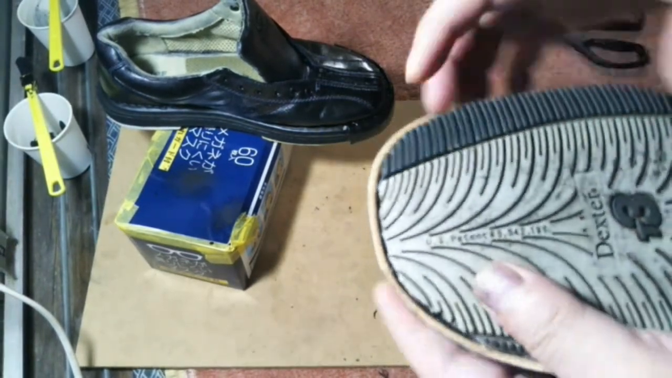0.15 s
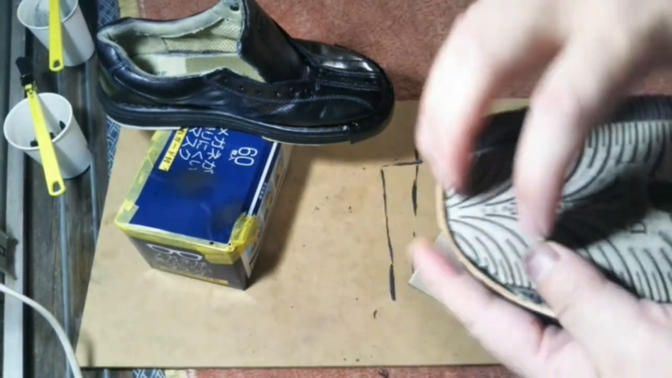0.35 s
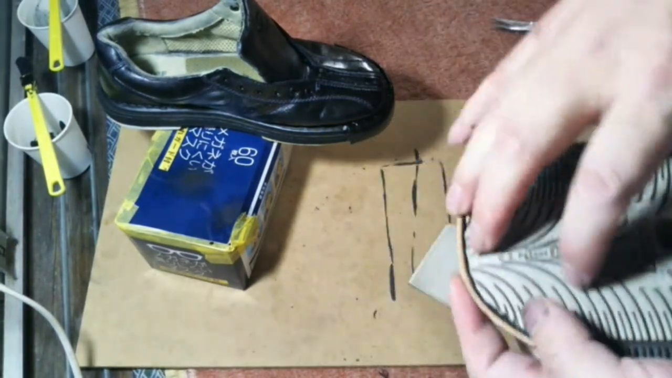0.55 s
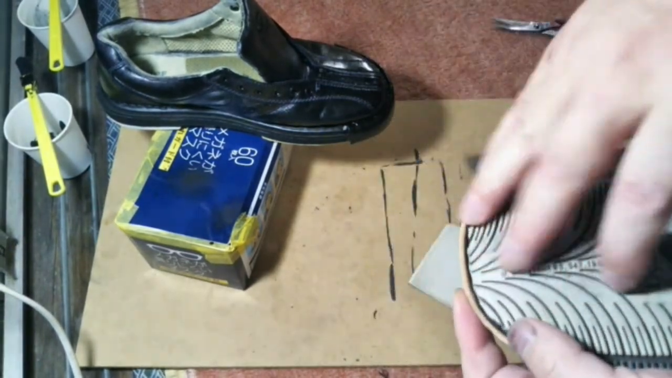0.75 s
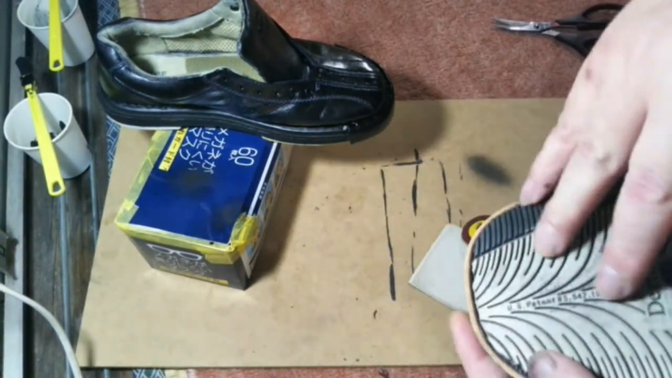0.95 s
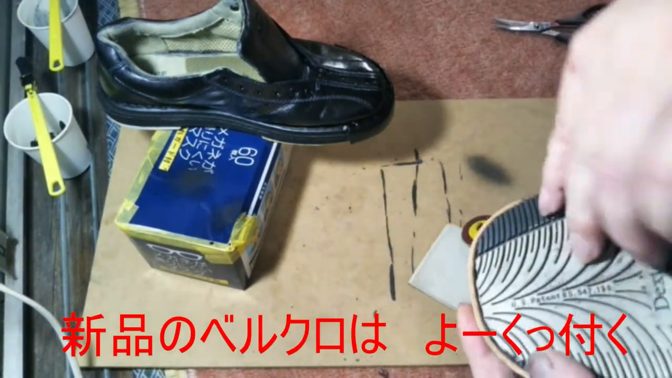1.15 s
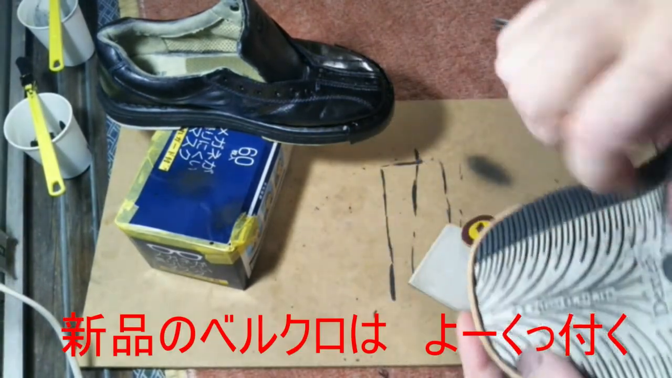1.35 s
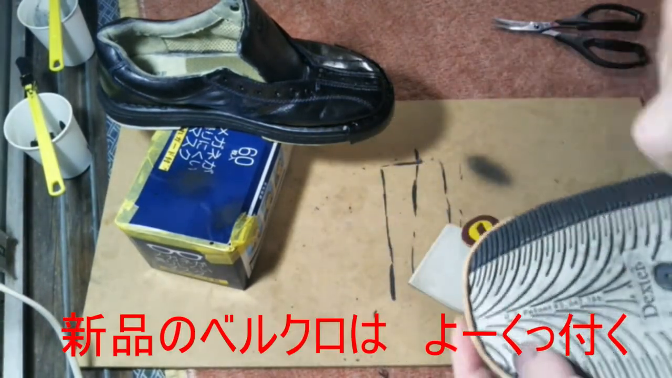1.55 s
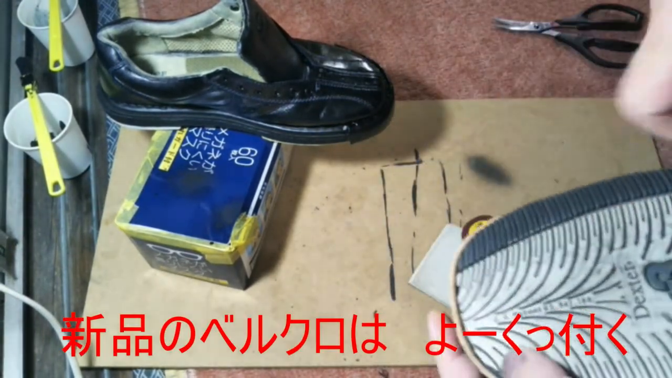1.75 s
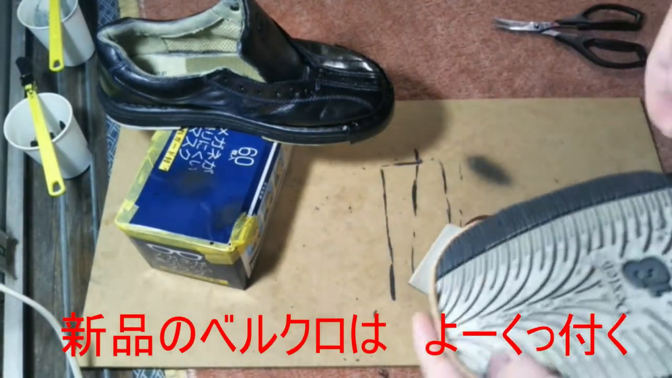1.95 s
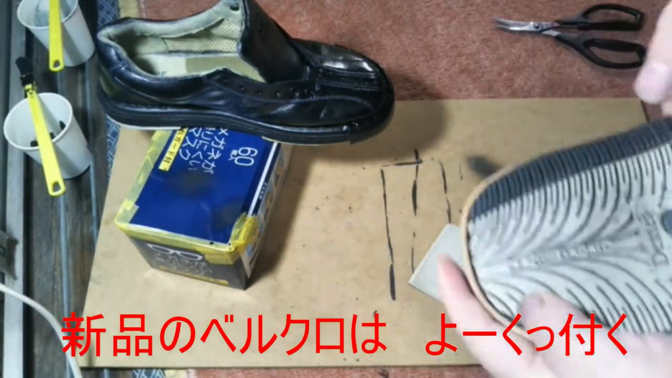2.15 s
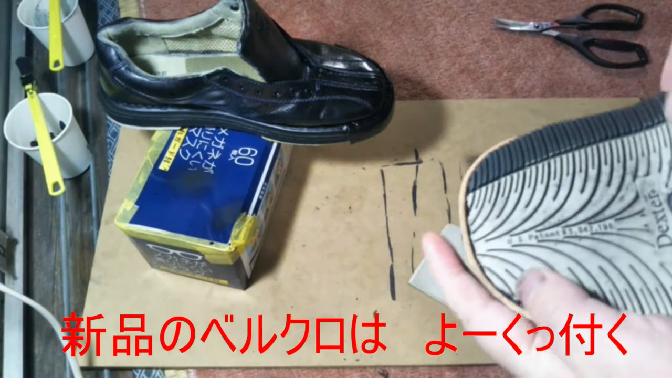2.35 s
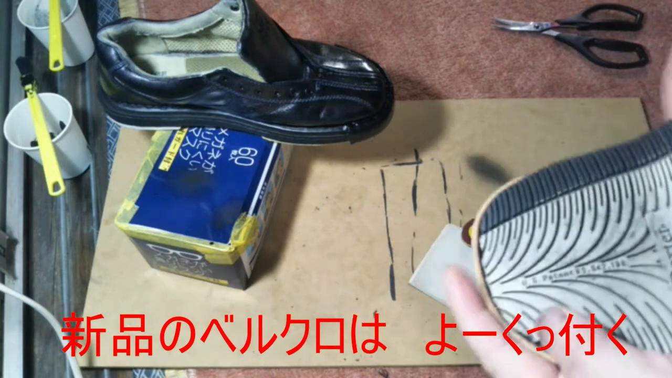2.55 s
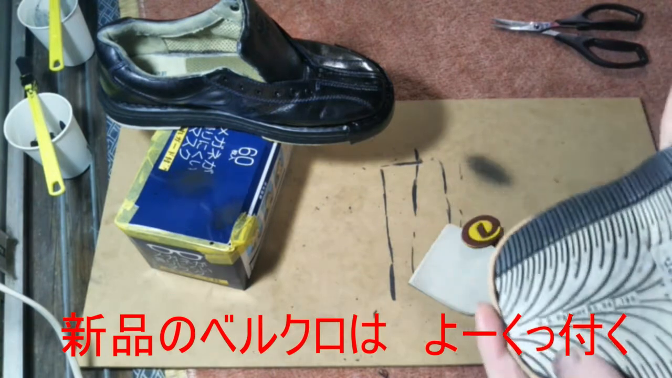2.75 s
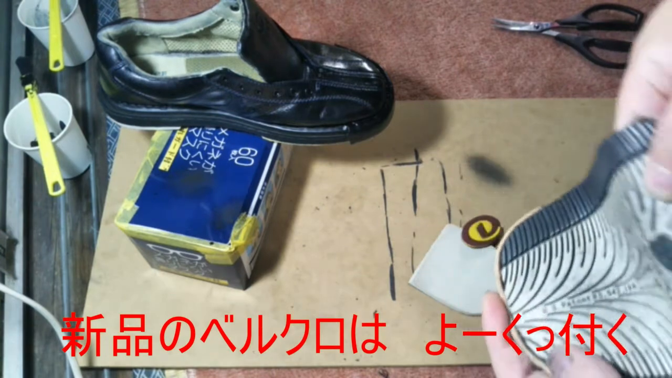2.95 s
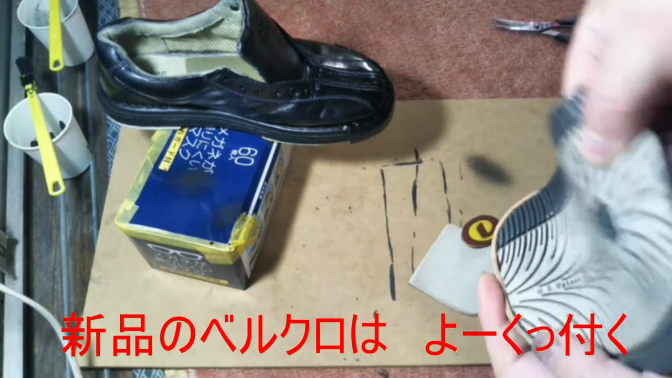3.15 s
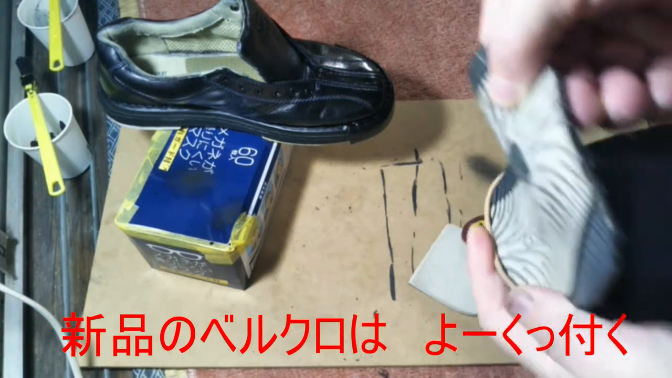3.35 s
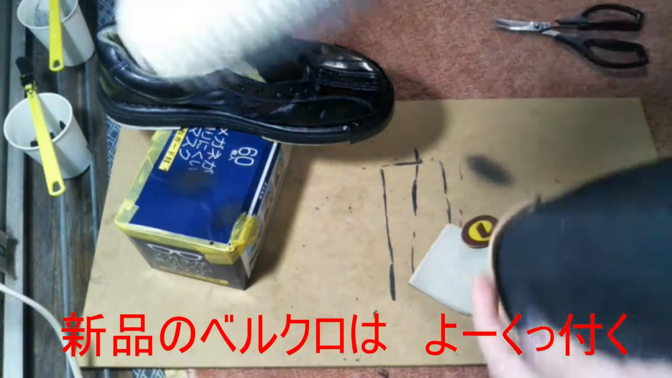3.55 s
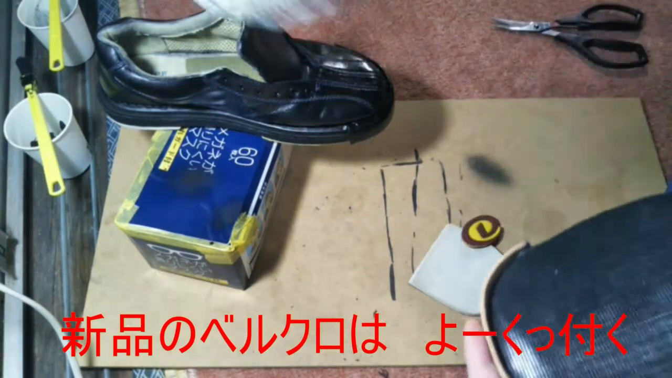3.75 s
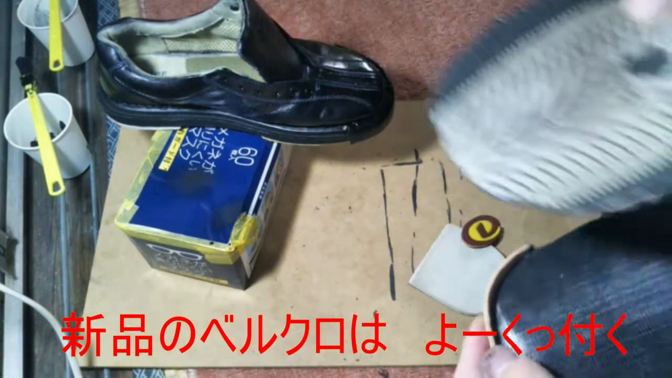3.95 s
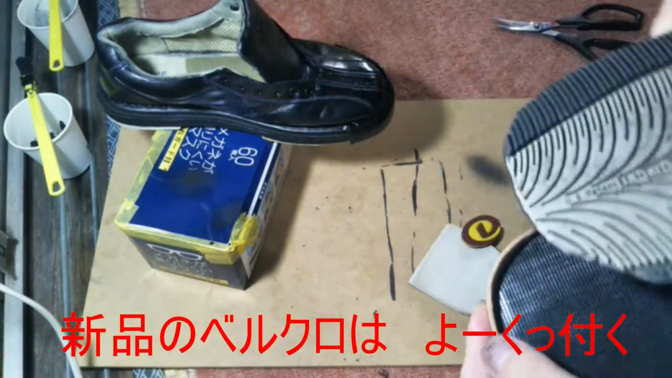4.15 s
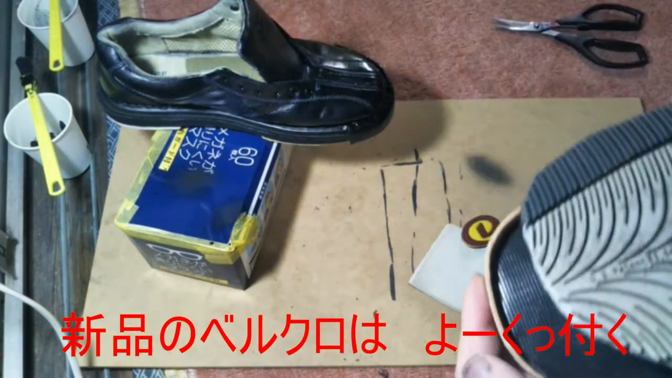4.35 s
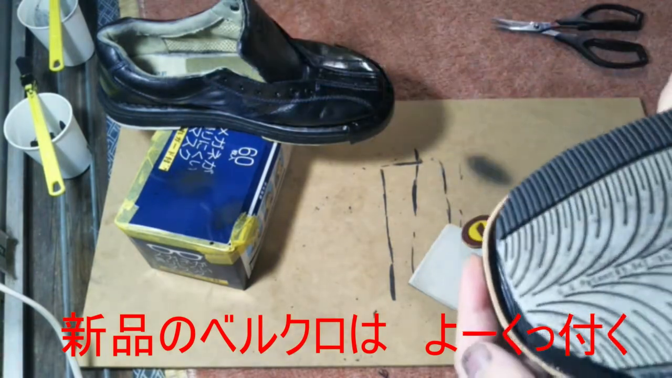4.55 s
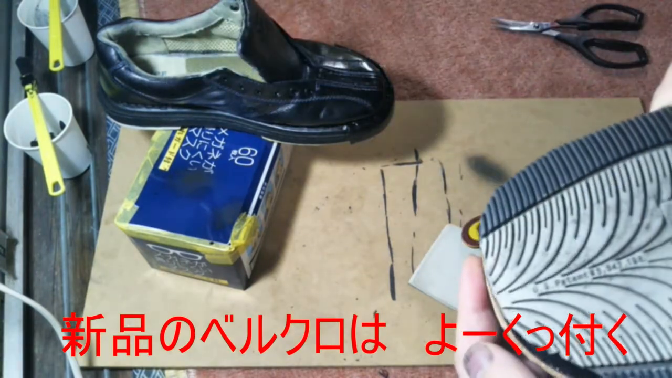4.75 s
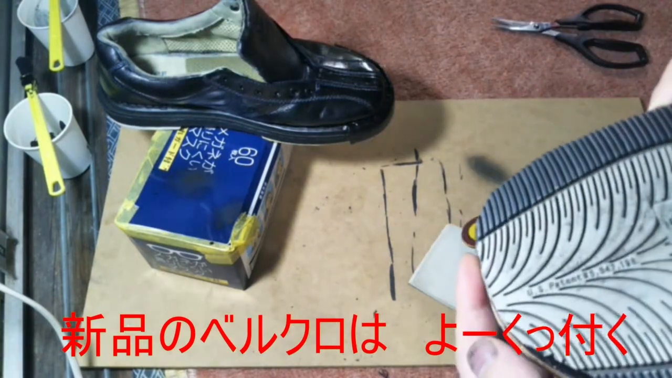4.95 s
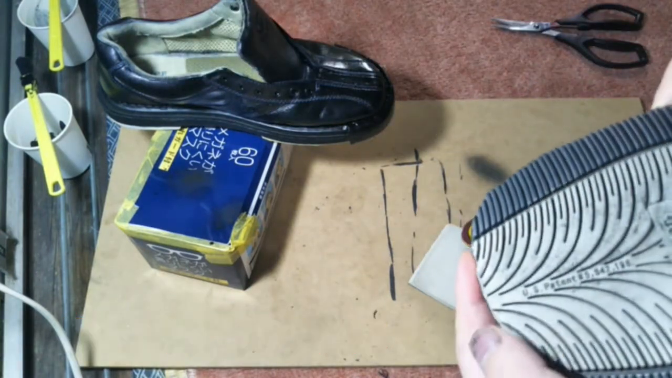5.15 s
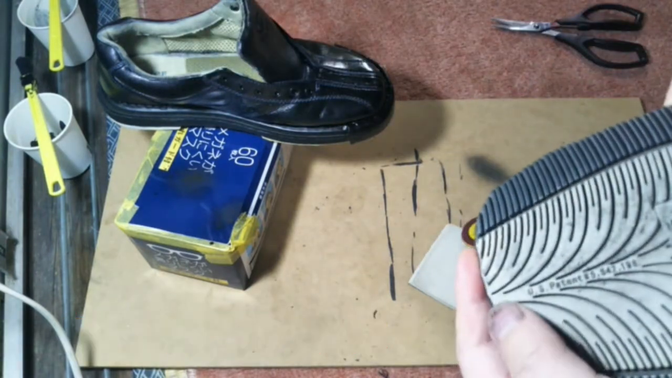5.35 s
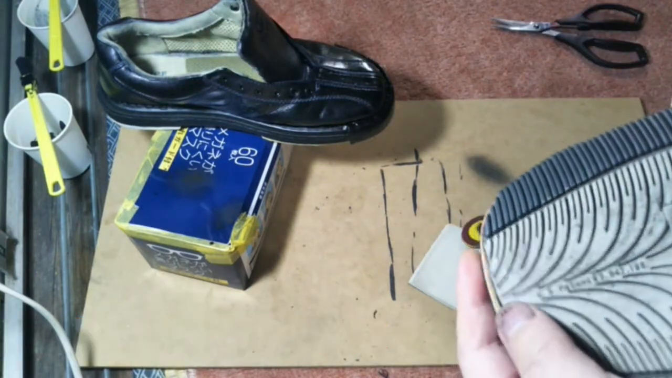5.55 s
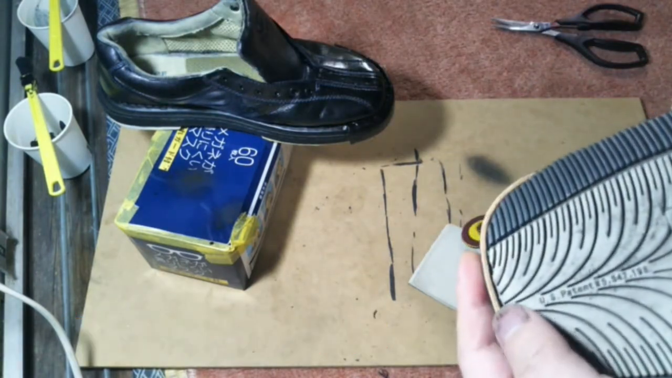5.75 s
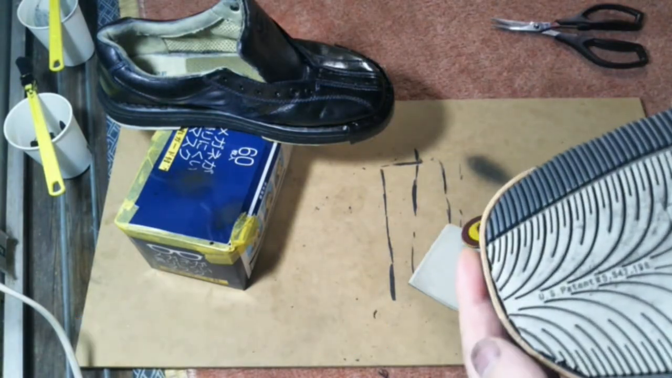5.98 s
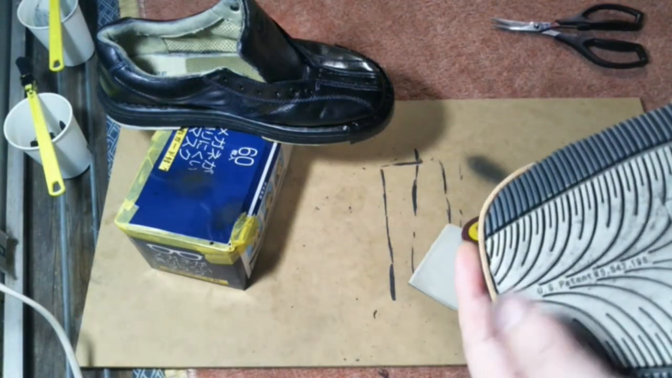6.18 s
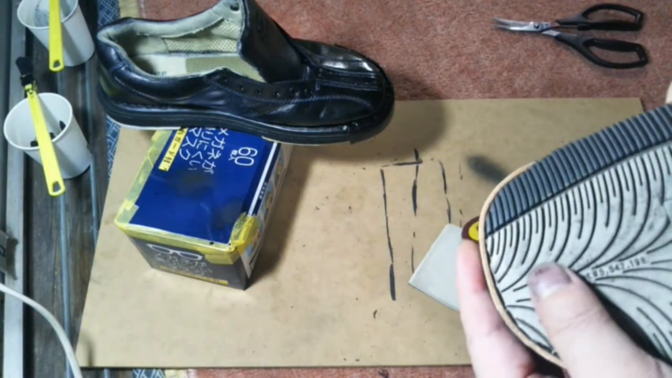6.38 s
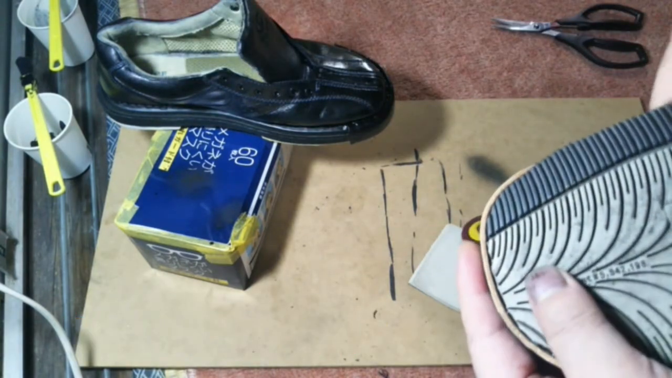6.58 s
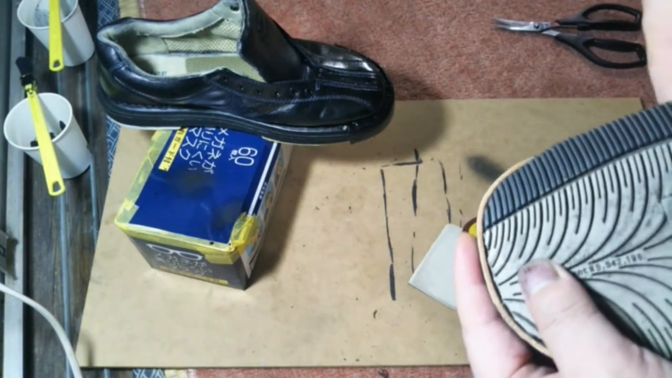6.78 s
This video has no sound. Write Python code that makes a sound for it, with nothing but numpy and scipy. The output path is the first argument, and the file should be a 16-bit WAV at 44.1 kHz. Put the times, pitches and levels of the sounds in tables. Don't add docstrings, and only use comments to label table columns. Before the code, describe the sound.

A quiet, dry workshop heard close up, with a soft low fan murmur and thin hiss throughout. From 0 to 0.7 s hands rub and tap lightly on a rubber sole while a small bird begins faint falling whistles outside. At about 0.8 s hooks let go in separate snaps, thickening into a bright dense rip from 0.9 to 1.34 s. Dull touches and soft knocks follow, the clearest near 1.65 and 1.88 s. From 2.1 to 2.6 s short weaker tugs crackle and catch, with a hollow tap at 2.33 s. The strongest tear runs 2.72 to 3.5 s, rubbery and harsh, with a thump at 3.2 s and a final jerk freeing the sole. Then skin rustles near 3.7 and 4.2 s, bird trills to 5.6 s, dull fingertip ticks around 5.6 s, and near stillness with a last brush and chirps at 6.6 s.

```python
import sys
import numpy as np
from scipy import signal
from scipy.fft import rfft, irfft, next_fast_len
from scipy.io import wavfile
from scipy.ndimage import uniform_filter1d

SR = 44100
rng = np.random.default_rng(int(sys.argv[2]) if len(sys.argv) > 2 else 0)


def decibels_to_gain(level_db):
    exponent = np.asarray(level_db, float) / 20
    return 10 ** exponent


def materialize(psi):
    bounded = np.clip(np.atleast_2d(psi).T, -1, 1)
    quanta = np.round(bounded * 32767).astype(np.int16)
    wavfile.write(sys.argv[1], SR, quanta)


N = 300762
PAD = next_fast_len(N + 8192)
HZ = np.maximum(np.fft.rfftfreq(PAD, 1 / SR), 1)

# (t/s, loose flap resonance f/Hz, share of the sole level/dB,
# looseness of the flap [0-1])
SOLE_HANG = [(0, 1930, 8.5, 0.54), (.76, 1700, 11, 1), (.83, 4600, -2.5, 0.8), (.92, 4170, 1.5, 0.9),
             (.97, 4160, 0, 0.3), (1.09, 2570, -3.5, 0.5), (1.17, 4030, -3, 0.46), (1.33, 3690, -8, 0.5),
             (2.13, 2480, 0.5, 0.44), (2.28, 2580, -8, 0.5), (2.35, 2440, -4.5, 0.92),
             (2.45, 2007, -9.5, 0.73), (2.63, 2416, 5.5, 0.95), (2.8, 2630, -8, .85),
             (3.02, 2500, -8.5, 0.5), (3.1, 2290, -4, .4), (3.16, 3470, -9, 1), (3.3, 3276, -12, 1),
             (3.41, 3050, -12.5, 1), (3.47, 3390, -9, 0.85)]


def in_time(rows):
    s, *columns = np.transpose(rows)
    return [np.interp(np.arange(N) / SR, s, c) for c in columns]


def at_hz(points):
    hz, db = np.transpose(points)
    return np.interp(np.log(np.minimum(HZ, 14000)), np.log(hz), db)


def drift(rate):
    knots = rng.standard_normal(2000)
    return np.interp(np.arange(N) / SR * rate, np.arange(len(knots)), knots)


def stretch(start_s, length_s):
    first = round(start_s * SR)
    return slice(first, first + round(length_s * SR))


def nearest(hz, choices):
    return np.abs(np.log(hz) - np.log(choices)[:, None]).argmin(axis=0)


def causal(db):
    cepstrum = irfft(db * np.log(10) / 20, PAD)
    cepstrum[1:PAD // 2] *= 2
    cepstrum[PAD // 2 + 1:] = 0
    response = np.exp(rfft(cepstrum))
    return response / np.sqrt(np.mean(np.abs(response) ** 2))


def hump(hz, width_hz, db):
    return db / (1 + (2 * (HZ - hz) / width_hz) ** 2)


def slope(low_hz, high_hz):
    return -10 * np.log10((1 + (low_hz / HZ) ** 10) * (1 + (HZ / high_hz) ** 10))


def noise(spectrum, level_db):
    shaped = irfft(rfft(rng.standard_normal(PAD)) * decibels_to_gain(at_hz(spectrum)), PAD)[:N]
    return decibels_to_gain(level_db) * shaped / np.sqrt(np.mean(shaped ** 2) + 1e-20)


def murmur(busy_db):
    # (f/Hz, level/dB per Hz)
    murmur_spectrum = [(88, -43), (150, 0), (246, -3.5), (428, 0.5), (540, -5.5), (1120, -12.5),
                       (1540, -10), (3390, -17), (3780, -13), (5730, -38), (6000, -44.5), (7800, -41),
                       (13200, -120)]
    return noise(murmur_spectrum, -66 + 1.31 * busy_db)


def rumble(busy_db):
    # (f/Hz, level/dB per Hz)
    rumble_spectrum = [(20, -43), (30, -18.5), (40, -13), (55, 2), (80, -2), (100, -5), (121, 6),
                       (140, -13.5), (200, -27.5), (400, -64.5)]
    shake_db, shake_s = -32, 0.06
    strength_db, brisk_db, _ = effort()
    shake = uniform_filter1d(decibels_to_gain(strength_db + brisk_db + shake_db), round(shake_s * SR))
    rest_db = -68 + 0.98 * busy_db
    return noise(rumble_spectrum, 10 * np.log10(decibels_to_gain(2 * rest_db) + shake ** 2))


def rustle(busy_db):
    # (f/Hz, level/dB per Hz)
    hiss = [(2940, -4.5), (5000, -12), (5810, -21.5), (6560, -12), (7060, -11), (9100, -6), (11500, -5.5),
            (13600, 0.5), (14000, -3.5)]
    # (start t/s, end t/s, lift level/dB)
    slides = [
        (0, 0.104, 4.5),
        (0.217, 0.358, 7.5),
        (0.504, 0.54, 6),
        (3.588, 3.786, 8),
        (4.173, 4.27, 9),
        (6.661, 6.74, 5.5),
    ]
    rustle_db = -68.5 + busy_db + 1.2 * drift(30)
    for start, end, db in slides:
        a, b = round(start * SR), round(end * SR)
        rustle_db[a:b] += db * np.sin(np.linspace(0, np.pi, b - a)) ** .5
    return noise(hiss, rustle_db), noise(hiss, rustle_db)


def effort():
    # (t/s, pull strength level/dB, briskness: hooks over backing level/dB)
    pulls = [
        [(0.826, -61, 10), (0.876, -52, 4.5), (0.895, -40, 2.5), (0.96, -39.5, 4.5), (0.966, -34, 7),
         (0.998, -38.5, 3.5), (1.106, -36, 5.5), (1.11, -36.5, 8)],
        [(1.11, -43.5, -1), (1.116, -34, 8), (1.15, -31, 7), (1.2, -31, 10.5), (1.25, -33.5, 9),
         (1.284, -31, 10), (1.312, -34, 4), (1.338, -47, 11.5)],
        [(2.74, -34.5, -2), (2.773, -41, -0.5), (2.779, -31.5, -5), (2.88, -29.5, 2), (2.935, -30.5, 0),
         (2.96, -27, 5.5), (3.0, -28.5, 7), (3.03, -32, 7.5), (3.06, -34.5, 10)],
        [(3.06, -35, 10.5), (3.14, -34, 8), (3.16, -30.5, 7.5), (3.172, -29.5, 8), (3.195, -25.5, 6.5),
         (3.226, -25.5, 0)],
        [(3.228, -29.5, -3.5), (3.255, -31.5, -0.5), (3.265, -29.5, -1), (3.282, -35, -2.5), (3.29, -30, -6),
         (3.368, -31, -3), (3.432, -27.5, -2), (3.45, -29.5, 3.5)],
    ]
    # (t/s, pull strength level/dB, briskness level/dB)
    last_jerk = [
        (3.45, -34, -1.5),
        (3.47, -31.5, 5.5),
        (3.487, -35, 7.5),
        (3.498, -31.5, 1.5),
    ]
    # (start t/s, length t/s, strength level/dB, briskness level/dB)
    tugs = [
        (2.105, 0.083, -37, 4),
        (2.157, 0.032, -39, 2),
        (2.24, 0.057, -43, 3),
        (2.334, 0.032, -41, 2),
        (2.415, 0.069, -50, 5),
        (2.489, 0.037, -34, 2.5),
        (2.51, 0.045, -43, -1),
        (2.553, 0.067, -44.5, -3),
        (2.738, 0.021, -46, 10.5),
        (5.592, 0.037, -51, -8),
    ]
    # (start t/s, length t/s, change level/dB)
    catches = [(0.872, 0.0046, -1), (.921, 0.0046, 0), (0.928, 0.0071, -10), (0.943, 0.0031, -3),
               (.955, 0.0048, -6), (0.979, .006, -7), (1.053, 0.0043, -8), (1.107, .006, -5),
               (2.184, 0.0064, -14), (2.241, 0.0047, -12), (2.251, .0045, -14), (2.284, .008, -7),
               (2.421, .006, -12), (2.47, 0.021, -6), (2.521, .008, -4), (2.727, 0.0061, 0),
               (3.054, 0.0066, -4.5), (3.28, 0.0089, -1.5)]
    # (start t/s, length t/s, strength level/dB, briskness level/dB)
    rubs = [(0.027, 0.066, -74.5, -3), (0.152, 0.018, -69.5, 1), (0.402, 0.033, -70.5, -12),
            (1.899, 0.088, -63.5, -2), (4.0, 0.077, -65, -6.5), (0.274, 0.042, -64.5, -8),
            (0.664, 0.041, -62, 10), (1.629, 0.038, -54.5, -6.5), (2.087, 0.032, -58, 0),
            (2.663, 0.048, -55.5, 0.5), (5.505, 0.076, -61.5, -14)]
    # (t/s, strength level/dB, briskness level/dB)
    lingers = [
        (1.338, -51, 0.5),
        (3.497, -47.5, -0.5),
    ]
    tug_attack_s, tug_fade_db = 0.015, 8
    slow_pull_db, slip_depth_db = -31.5, -3.5
    rub_swell_db = 15.5
    linger_s, linger_fade_db = 0.062, 23

    strength_db, brisk_db = np.full(N, -200.), np.zeros(N)
    for pull in pulls + [last_jerk]:
        a, b = round(pull[0][0] * SR), round(pull[-1][0] * SR)
        strength_db[a:b], brisk_db[a:b] = (c[a:b] for c in in_time(pull))
    for start, length, db, brisk in tugs:
        span = stretch(start, length)
        after = np.arange(span.stop - span.start) / SR
        attack_db = -12 * np.maximum(1 - after / tug_attack_s, 0)
        strength_db[span] = db - tug_fade_db * after / length + attack_db
        brisk_db[span] = brisk
    creep = slice(round(2.1 * SR), round(2.63 * SR))
    strength_db[creep] = np.maximum(strength_db[creep], -61)
    for start, length, db in catches:
        strength_db[round(start * SR):round((start + length) * SR)] += db
    slip_db = slip_depth_db * np.clip((slow_pull_db - strength_db) / 10, 0, 1)
    for start, length, db, brisk in rubs:
        span = stretch(start, length)
        part = np.linspace(0, 1, span.stop - span.start)
        strength_db[span] = db - rub_swell_db * (1 - np.sin(2.2 * part))
        brisk_db[span], slip_db[span] = brisk, 0
    for start, db, brisk in lingers:
        span = stretch(start, linger_s)
        part = np.linspace(0, 1, span.stop - span.start)
        strength_db[span] = db - linger_fade_db * part
        brisk_db[span], slip_db[span] = brisk, 1
    return strength_db, brisk_db, slip_db


def slips():
    slips_per_s = 100
    at = np.arange(N)
    last = np.maximum.accumulate(at * (rng.random(N) < slips_per_s / SR))
    size = 0.36 * rng.standard_normal(N)[last]
    decay = 0.37 * (1 - (at - last) * slips_per_s / SR)
    return np.maximum(size + decay, -2.5)


def sizes(spread_db):
    return decibels_to_gain(spread_db * np.minimum(rng.exponential(1, N), 3)) * rng.choice([-1, 1], N)


def hook_swarm(sole_db):
    strength_db, brisk_db, depth_db = effort()
    patchy_db = sole_db + 3 * drift(25.02)
    strength = decibels_to_gain(strength_db + np.array([brisk_db, 0 * sole_db, patchy_db]))
    per_s = np.clip(strength[0] * 140000.0, 1000, 10000)
    per_s[depth_db == 0] = 4600
    clump = decibels_to_gain(np.maximum(2.6 * drift(130) + 1.1 * drift(45), -3.5))
    clicks = sizes(2.1) * (rng.random(N) < per_s * clump / SR)
    clicks = clicks * np.sqrt(SR / per_s)
    clicks = clicks * decibels_to_gain(depth_db * slips() - 0.03 * depth_db ** 2)
    return strength * clicks / np.sqrt(np.mean(clicks[strength_db > -100] ** 2))


def releases():
    # (t/s, hooks level/dB, backing level/dB, sole level/dB)
    touches = [(.1288, -72, -58, -29.5), (.2197, -45, -54, -29.5), (.2859, -33, -32, -40),
               (.2915, -34, -33, -43), (.3472, -39, -32.5, -43), (.401, -37, -37, -29.5),
               (.4728, -30, -33, -30), (.5137, -43, -33, -22), (1.3688, -24, -39, -23.5),
               (1.3762, -19.5, -28, -53), (1.4984, -35, -40, -26), (1.5307, -39, -43, -60),
               (1.562, -42, -50, -60), (1.59, -47, -43, -53), (1.655, -40, -29, -20.5),
               (1.741, -62, -70, -27), (1.747, -39, -55, -48), (1.408, -37, -48, -55),
               (1.7807, -50, -52, -24.5), (1.8837, -20.5, -23, -5), (1.9591, -31, -31.5, -21.5),
               (3.6572, -32, -36.5, -32), (4.013, -52, -38, -42), (4.0619, -52, -39, -59),
               (4.2225, -41, -40, -62), (5.5854, -54, -35, -37), (5.5924, -51, -22.5, -31),
               (5.5997, -39.5, -19.5, -30), (5.6262, -62, -39, -38), (5.86, -49, -38, -60),
               (5.9599, -39.5, -36, -57), (6.3911, -57, -37.5, -51.5), (.078, -48, -37.5, -43),
               (.162, -48, -45, -43), (.228, -44, -55, -45), (.358, -43, -41, -44), (.362, -57, -40, -44),
               (.414, -47, -39, -25), (.481, -38, -34, -41), (1.932, -40.5, -31, -32),
               (2.087, -55, -46, -29)]
    # (t/s, energy level/dB, briskness level/dB)
    firsts = [(0.767, -44, 23.5), (0.785, -36, 13), (0.825, -33.5, 10.5), (0.8315, -25, 12),
              (.8392, -32, 12), (0.8487, -38.5, 14), (0.8545, -30.5, 10), (0.867, -22.5, 14),
              (.888, -27, 9), (0.8925, -19, 8), (0.9134, -11, 7), (0.9292, -17, 10), (0.938, -14.5, 8),
              (.9478, -18.5, 15), (0.9638, -19, 0), (0.9704, -15, 2.5), (.976, -13.5, 11),
              (0.9865, -14.5, 5), (2.7172, -27.5, -3.5), (2.7214, -22, -1), (2.73, -26, 0),
              (2.7449, -10, -8), (2.7546, -15, -18), (2.759, -17, -6), (2.777, -12, -11.5),
              (2.7878, -6.5, -10)]
    # (t/s, energy level/dB, briskness level/dB)
    single_snaps = [(2.102, -28, -5), (2.1198, -17, -4), (2.125, -10, 0), (2.1315, -12.5, -2),
                    (2.1407, -24.5, 12), (2.1531, -15.5, -3), (2.169, -24, 7), (2.1798, -11.5, -15),
                    (2.1989, -12, -4), (2.2177, -15.5, -5), (2.247, -22, -9), (2.256, -21, 6),
                    (2.263, -18, -8), (2.2692, -11, -5), (2.2758, -23, 2), (2.2873, -21.5, 3),
                    (2.3166, -25, 5), (2.343, -14, 0), (2.3482, -10, -4), (2.3534, -15.5, -1),
                    (2.409, -28, 10), (2.423, -12, -11), (2.431, -16, 2), (2.4412, -16, -3),
                    (2.4583, -20.5, -4), (2.483, -14.5, -5), (2.4952, -12, -14), (2.504, -14.5, -7),
                    (2.539, -16, -10), (2.5713, -19, 0),
                    (1.049, -24, 2), (1.063, -23, 6), (1.075, -7, 1), (1.113, -20.5, 11), (1.190, -12, 6),
                 (2.807, -20, -3), (2.832, -6, -2), (2.877, -10, 0), (3.182, -13, 12), (3.369, -12.5, 2),
                 (1.101, -15, -0.5), (1.13, -3.5, -7), (1.142, -9, 9), (1.146, -9.5, 2), (1.160, -10, 6.5),
                 (1.165, -13.5, -1), (1.195, -8, 4), (1.281, -10, 6), (1.291, -7.5, 2), (2.175, -22, -2),
                 (2.183, -25, -6), (2.195, -28, 6), (2.279, -19, 3), (2.283, -26, 3), (2.292, -42, 9),
                 (2.360, -29, 4), (2.397, -43, -3), (2.413, -28.5, 4), (2.421, -20, -3), (2.446, -17.5, -5),
                 (2.449, -20.5, -1), (2.454, -23, 8), (2.461, -23, 1), (2.475, -25, -3), (2.487, -20.5, -2),
                 (2.491, -20, -6), (2.499, -17, -13), (2.524, -15, -11), (2.535, -20, -1),
                 (2.551, -24.5, 2), (2.558, -22, 4), (2.569, -24.5, -2), (2.575, -27, 3), (2.585, -35, 3),
                 (2.814, -6.5, -9), (2.849, -10.5, -1), (3.028, -10, 11), (3.046, -13, 2), (3.158, -9.5, 5),
                 (3.162, -7.5, 1), (3.255, -4, -2), (3.292, -20, -10), (3.489, -8, 3.5)]
    flap_spread_db, sole_spread_db = 0.96, -1.5

    flap_hz, sole_db, _ = in_time(SOLE_HANG)
    train = hook_swarm(sole_db)
    snaps = [(s, db + brisk, db, db + sole_db[round(s * SR)])
             for s, db, brisk in firsts + single_snaps]
    after = np.arange(100)
    for k, (s, *energy_db) in enumerate(touches + snaps):
        group = rng.standard_normal(100) * (rng.standard_normal(100) > 1.17) * decibels_to_gain(-.16 * after)
        group[0] = 1.5
        sole, flap = rng.standard_normal(2)
        is_snap = k >= len(touches)
        energy = decibels_to_gain(np.array(energy_db) + [0, 0, sole_spread_db * sole * is_snap])
        at = round(s * SR)
        train[:, at + after] += energy[:, None] * group / np.linalg.norm(group)
        flap_hz[at + after] = flap_hz[at] * decibels_to_gain(flap_spread_db * flap)
    return train, flap_hz


def tear_colour():
    # (f/Hz, level/dB per Hz)
    tear = [(71, -47), (120, -8), (261, -4.5), (465, -5), (524, -8), (665, 1.5), (1160, -4), (1540, 0.5),
            (2200, -0.5), (3610, -2.5), (5710, -4.5), (7400, -1.5), (11000, -6), (14000, -6.5)]
    # (f/Hz, width f/Hz, level/dB)
    body = [(417.4, 300, 11), (674, 180, 9.5), (1516, 120, 9), (1836, 180, 9.5), (5850, 650, -6.5),
            (7540, 270, 2.5), (14050, 1500, 8)]
    return at_hz(tear) + sum(hump(*mode) for mode in body)


def backing_ring(clicks, flap_hz, tear_db):
    pressed_back_s = 3.9
    flaps = np.geomspace(1700, 4500, 9)
    dealt = nearest(flap_hz * decibels_to_gain(rng.normal(0, .25, N)), flaps)
    dealt[round(pressed_back_s * SR):] = -1
    loose = np.clip(in_time(SOLE_HANG)[2], 0, 1)
    dull = causal(tear_db + slope(1400, 3600) + hump(2650, 700, 10.0) + hump(2100, 600, 2.4))
    ring = rfft(clicks * (dealt < 0), PAD) * dull
    whole = causal(tear_db + slope(1236, 8800) + hump(2700, 440, 11.0) + hump(4300, 900, 6.6))
    ring = ring + rfft(clicks * (dealt >= 0) * np.sqrt(1 - loose ** 2), PAD) * whole
    for k, hz in enumerate(flaps):
        duller_db = -5.0 * np.log2(np.maximum(HZ / hz, 1))
        duller_db = duller_db - 3.6 * np.log2(np.maximum(hz / HZ / 0.8, 1))
        modes_db = hump(hz, 400, 13) + hump(1.33 * hz, 500, -5)
        modes_db = modes_db + hump(min(1.68 * hz, 4600), 800, 17 * min(1, 2600 / hz) ** 2)
        flap = causal(tear_db + slope(1150, 5900) + modes_db + duller_db)
        ring = ring + rfft(clicks * loose * (dealt == k), PAD) * flap
    return ring


def hook_ring(clicks, faces, tear_db):
    # (t/s, treble resonance f/Hz)
    strip_length = [(.85, 7800), (1.0, 7500), (1.06, 8200), (1.16, 7500), (1.28, 8200), (2.13, 7700),
                    (2.3, 10000), (2.8, 7600), (2.85, 9500), (2.92, 7600), (3.0, 8500), (3.09, 10300),
                    (3.17, 9000), (3.22, 9000), (3.3, 7600), (3.37, 12000), (3.41, 8500), (3.45, 11000)]
    strips = np.geomspace(7000, 13000, 9)
    route = nearest(in_time(strip_length)[0] * decibels_to_gain(1.5 * rng.standard_normal(N)), strips)
    ring = 0
    for k, hz in enumerate(strips):
        modes_db = hump(hz, 1800, 5.2) + hump(12900, 2530, 3.1) + hump(6750, 900, 1.9)
        hooks = causal(tear_db + slope(5950, SR) + modes_db)
        paths = rng.standard_normal((2, 130)) * decibels_to_gain(-np.arange(130) * 0.18)
        paths[:, 0] = 2.1
        paths = rfft(paths / np.linalg.norm(paths, axis=1)[:, None], PAD)
        ring = ring + rfft(clicks * faces * (route == k), PAD) * hooks * paths
    return ring


def fastener():
    # (t/s, treble level/dB)
    facing = [(.83, 6.5), (.91, 4), (.98, -2), (1.04, 3), (1.19, 2.5), (1.29, 1.5), (1.33, 3), (2.1, 1.5),
              (2.74, 4.5), (2.84, 4), (2.91, 5.5), (3.0, 0.5), (3.15, 1.5), (3.195, 1.5), (3.29, 0.5),
              (3.37, 6), (3.43, 2.5), (3.49, 6)]
    beam_hz = 10500
    flex_s, flex_db = 2.94, -11.5
    train, flap_hz = releases()
    hooks, backing, sole = train
    tear_db = tear_colour()
    faces = np.array([np.ones(N), rng.choice([-1, 1], N)])
    mid, side = hook_ring(hooks, faces, tear_db)
    mid = mid + rfft(sole, PAD) * causal(tear_db + slope(100, 1015))
    mid = mid + backing_ring(backing, flap_hz, tear_db)
    flexing = backing * faces[1] * (np.arange(N) > flex_s * SR)
    mid = mid + decibels_to_gain(flex_db) * rfft(flexing, PAD) * causal(slope(850, 1262))
    both = np.array([mid, side])
    whole = irfft(both, PAD)[:, :N]
    top = irfft(both / (1 + (beam_hz / HZ) ** 12), PAD)[:, :N]
    return whole + (decibels_to_gain(in_time(facing)[0]) - 1) * top


def knocks():
    # (t/s, peak level/dB, f/Hz, t60 t/s)
    knock_events = [
        (0.411, -34.5, 81, 0.026),
        (1.649, -33, 217, 0.08),
        (1.884, -34, 152, 0.025),
        (2.336, -41.5, 72.7, 0.12),
        (2.331, -30, 680, 0.054),
        (2.586, -58, 695, 0.057),
        (3.217, -28, 207, 0.044),
        (3.496, -29, 58.3, 0.066),
        (5.631, -47, 70.2, 0.088),
    ]
    out, after = np.zeros(N + 9000), np.arange(9000) / SR
    for s, db, hz, t60 in knock_events:
        push = np.minimum(after / .003, 1)
        ring = np.sin(2 * np.pi * hz * after) * decibels_to_gain(db - 60 * after / t60) * push
        out[round(s * SR):][:9000] += ring
    return out[:N]


def bird():
    # (start t/s, peak level/dB)
    trill = [(.584, -56.5), (.660, -53.5), (.734, -50.5), (.809, -53), (1.557, -57), (1.622, -56),
             (1.69, -54.5), (1.758, -65), (2.655, -53), (3.724, -57), (3.790, -58), (3.860, -57),
             (3.931, -58), (3.993, -55), (4.296, -55), (4.375, -52), (4.451, -52), (4.525, -53.5),
             (4.598, -52.5), (4.675, -54), (4.748, -54), (4.819, -54), (6.604, -57.5), (6.681, -53),
             (6.757, -53)]
    # (start t/s, peak level/dB)
    twitter = [(.524, -60), (1.397, -60), (1.447, -56.5), (1.491, -55), (1.525, -69), (1.59, -59),
               (1.65, -60), (1.72, -60), (1.776, -58), (1.807, -56), (1.840, -58), (1.876, -60),
               (1.908, -58), (1.94, -75), (1.97, -75), (2.03, -72), (2.06, -64), (3.600, -64), (3.668, -60),
               (4.100, -67), (4.140, -62), (4.180, -62), (4.218, -61), (4.25, -67), (4.922, -55),
               (4.972, -58), (5.010, -54.5), (5.112, -54), (5.158, -55.5), (5.202, -54), (5.303, -56.5),
               (5.350, -54.5), (5.464, -54.5), (5.507, -59), (5.623, -54.5), (5.962, -66), (6.015, -72),
               (6.05, -73), (6.215, -70), (6.25, -68.5), (6.29, -69), (6.529, -65)]
    fall_spread, note_dip_db = 0.27, 13
    out = np.zeros(N + SR)
    for notes, top_hz, bottom_hz, length in ((trill, 4170, 3440, 0.048), (twitter, 4050, 3480, 0.0357)):
        part = np.linspace(0, 1, round(length * SR))
        for s, db in notes:
            high, far, dip = rng.standard_normal(3)
            fall_hz = (bottom_hz - top_hz) * (1 - fall_spread * abs(far))
            hz = (1 + 0.0056 * high) * (top_hz + fall_hz * np.sin(1.365 * part) ** 1.243)
            note = np.sqrt(np.sin(np.pi * part ** 0.9)) * np.sin(np.cumsum(2 * np.pi * hz / SR))
            note = note * decibels_to_gain(-note_dip_db * np.exp(-((part - .42 - .1 * dip) / .11) ** 2))
            out[round((s - .004) * SR):][:len(part)] += decibels_to_gain(db - 4) * note
    out[:N] *= decibels_to_gain(2 * drift(130))
    after = np.arange(9000) / SR
    echoes = rng.standard_normal(9000) * decibels_to_gain(-27.5 - 60 * after / 0.28)
    echoes[0] = 1
    return signal.fftconvolve(out, echoes)[:N]


def bench(x):
    after = np.arange(9000) / SR
    tail = rng.standard_normal(9000) * decibels_to_gain(-41 - 60 * after / .13) * (after > .003)
    return x + signal.fftconvolve(x, tail[None], axes=1)[:, :N]


def scene():
    # (t/s, level over rest level/dB)
    busy = [
        (0, 2),
        (.564, 4.5),
        (.64, 4),
        (1.42, 4),
        (2.07, 3),
        (3.56, 4),
        (3.73, 1.5),
        (6.3, 0.5),
        (6.62, 1.5),
        (6.82, 3),
    ]
    side_edge_hz, side_db = 7130, -6
    busy_db, = in_time(busy)
    rustle_mid, rustle_side = rustle(busy_db)
    mid, side = bench(fastener())
    mid = mid + rustle_mid + murmur(busy_db) + rumble(busy_db) + knocks() + bird()
    treble = signal.butter(8, side_edge_hz, "high", fs=SR, output="sos")
    side = decibels_to_gain(side_db) * signal.sosfilt(treble, side + rustle_side)
    return np.array([mid + side, mid - side])


def roll_off(x):
    return signal.sosfilt(signal.butter(12, 15620, fs=SR, output="sos"), x)


def record(dry):
    edge = signal.firwin(1401, 14250, window=("kaiser", 6.5), fs=SR)
    cut = signal.fftconvolve(dry, edge[None], "same", axes=1)
    return roll_off(cut)


dry = scene()
out = record(dry)
materialize(out)
```